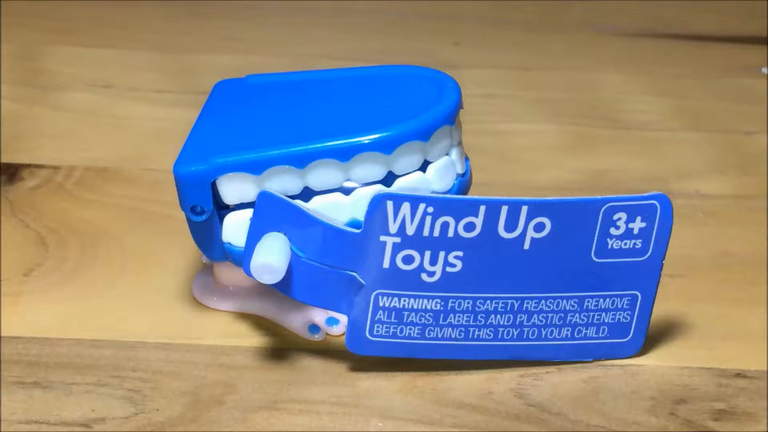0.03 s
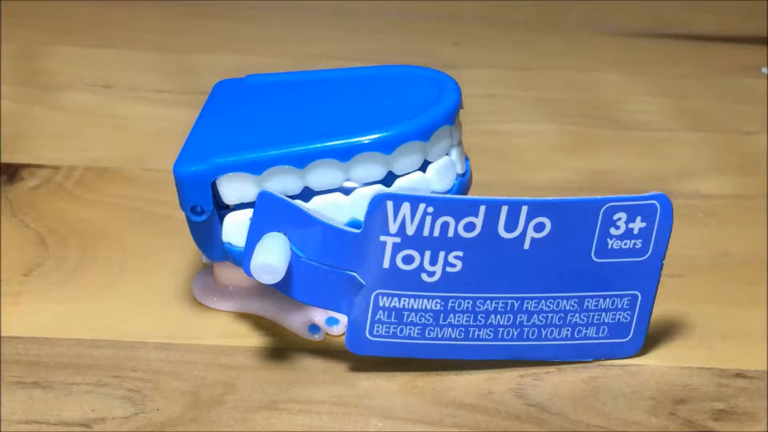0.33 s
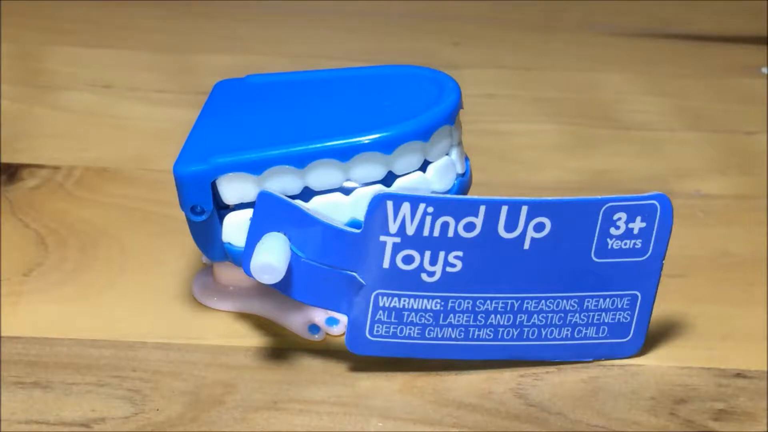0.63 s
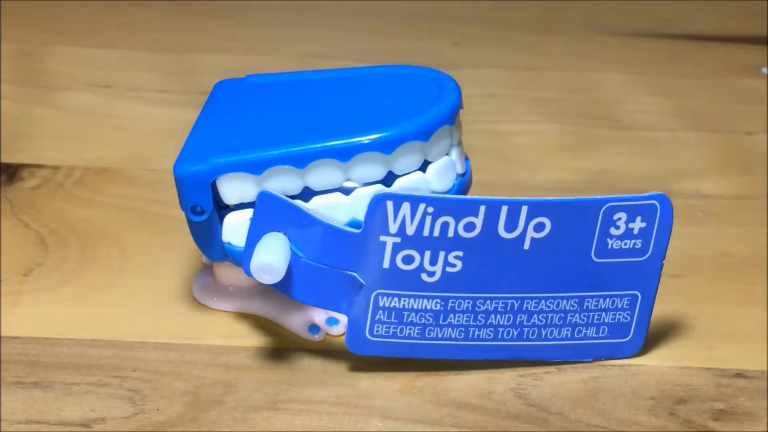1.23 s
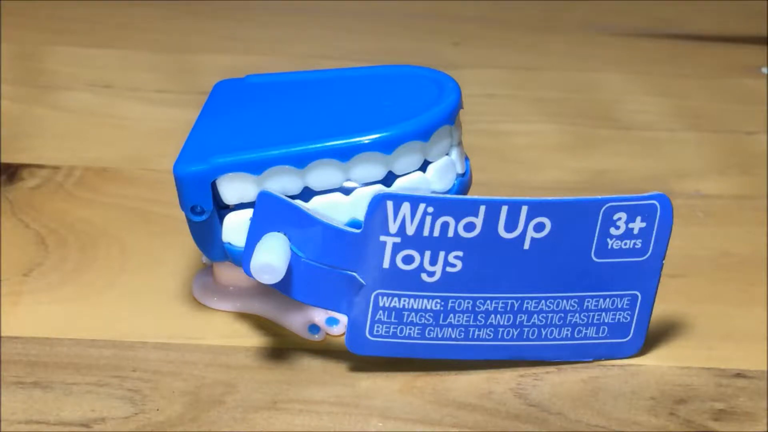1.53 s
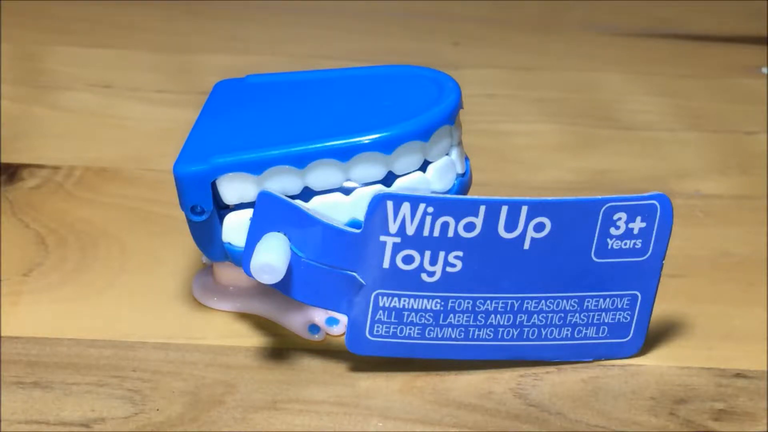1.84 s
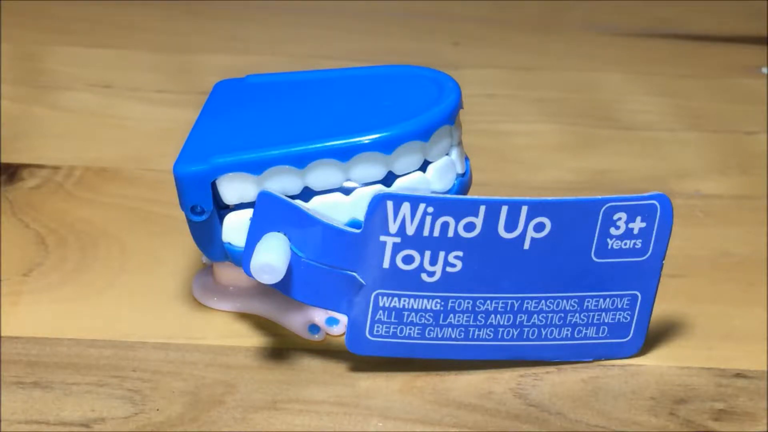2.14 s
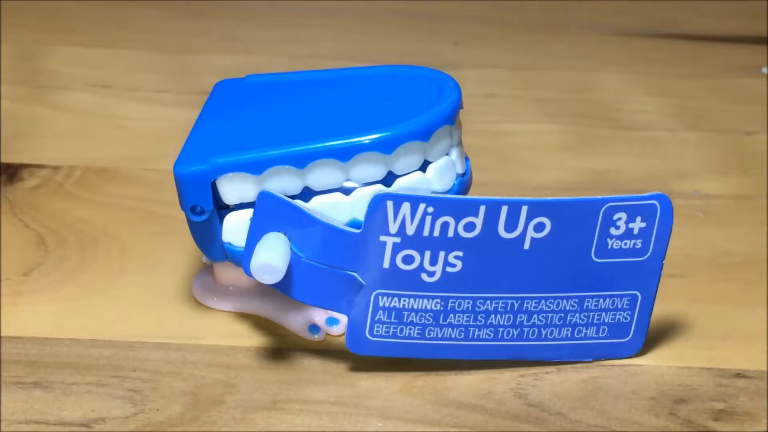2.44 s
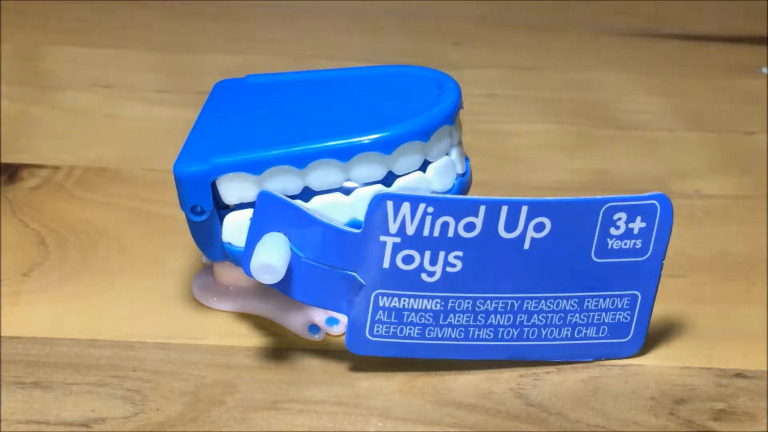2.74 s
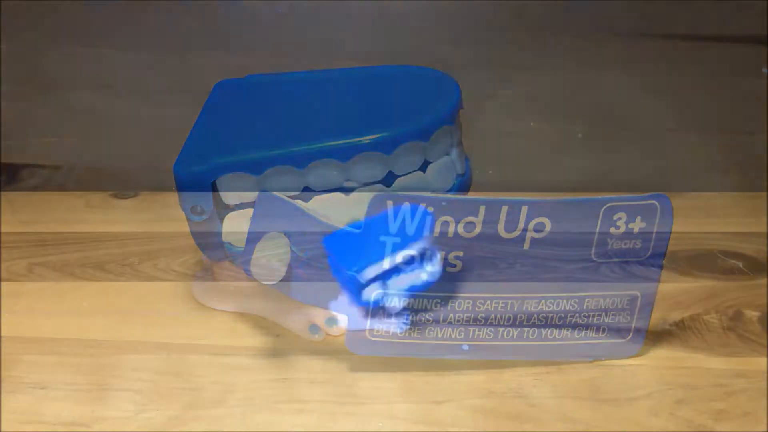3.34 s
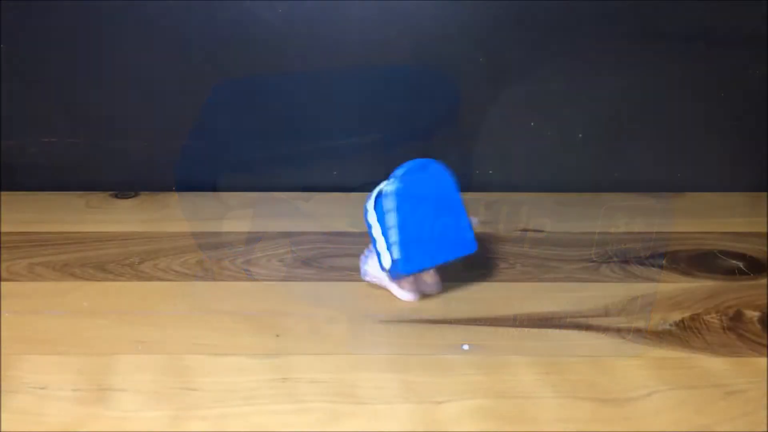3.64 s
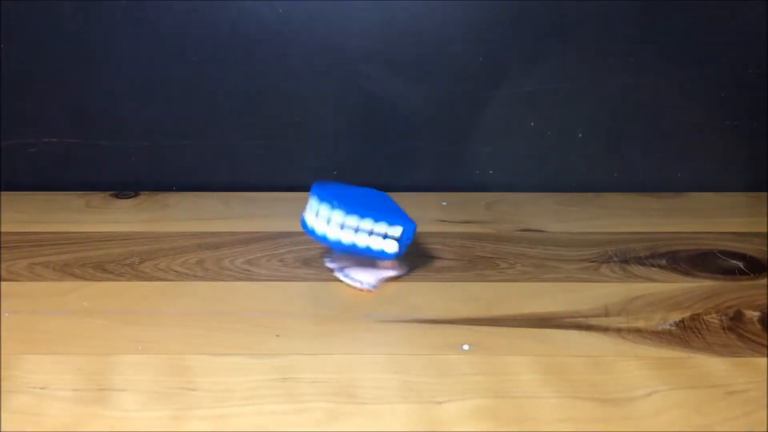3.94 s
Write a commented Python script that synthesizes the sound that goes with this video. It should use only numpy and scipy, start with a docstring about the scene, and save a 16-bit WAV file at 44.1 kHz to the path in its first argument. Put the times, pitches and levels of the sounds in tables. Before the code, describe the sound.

Wind-up plastic teeth chatter and hop on a wooden table, close by in a small room. For the first 2.8 seconds there is only a faint, low room hum. Then the toy starts suddenly, with sharp, hollow clacks in a fast, uneven run until about 4 seconds. Gears tick between the clacks, and the landings add light knocks and thuds on the wood, with a short room echo.

```python
"""Quiet room hum comes first; then a wind-up pair of plastic teeth chatters and hops on a wooden table,
close by in a small room. Once the spring is let go, each clack is a brief buzz of loose parts that rings
the hollow jaws and knocks the table. Gears tick in between, heavy landings thud, and the recorder
rounds the peaks."""
import sys
import numpy as np
from scipy import signal
from scipy.fft import rfft, irfft
from scipy.io import wavfile

SR = 44100
rng = np.random.default_rng(int(sys.argv[2]) if len(sys.argv) > 2 else 0)


def inscribe(sig):
    """Save sig as 16-bit PCM at rate SR to the path in sys.argv[1].

    A 1-D sig is mono; a 2-D sig holds one channel per row.
    Samples are clipped to [-1, 1] before scaling.
    """
    pcm = np.round(np.clip(np.atleast_2d(sig).T, -1, 1) * 32767)
    wavfile.write(sys.argv[1], SR, pcm.astype(np.int16))


N = 176400


def undb(db):
    """Decibels to gain."""
    return 10 ** (np.asarray(db) / 20)


def add(out, t, sound):
    """Mix a sound in at t seconds."""
    i = min(int(t * SR), N)
    out[i:i + len(sound)] += sound[:N - i]


def noise(colour):
    """Noise of rms 1, coloured by (frequency [Hz], relative level [dB]) points."""
    hz, db = np.array(colour, float).T
    bin_hz = np.maximum(np.arange(N // 2 + 1) * SR / N, 1)
    eq = undb(np.interp(np.log(bin_hz), np.log(hz), db))
    coloured = irfft(rfft(rng.standard_normal(N)) * eq, N)
    return coloured / coloured.std()


def bursts(times, dbs, decays, attack_s=0.00045, hold_s=0.0012):
    """Envelope of hits that rise, hold briefly and die away; their powers add."""
    power, age = np.zeros(N), np.arange(SR // 4) / SR
    for t, db, decay in zip(times, dbs, np.broadcast_to(decays, len(times))):
        shape = np.minimum(age / attack_s, 1) * np.exp(-np.maximum(age - hold_s, 0) / decay)
        add(power, t, (undb(db) * shape) ** 2)
    return np.sqrt(power)


def ring(modes, times, dbs, tunings=1, rise_s=0.0012, detune=0.01, spread_db=2.5):
    """Every hit sets the modes ringing, each time with a slightly different pitch and balance."""
    out, age = np.zeros(N), np.arange(SR // 5) / SR
    hz, t60, db = np.array(modes, float).T[:, :, None]
    envelope = undb(db - 60 * age / t60) * (1 - np.exp(-(age / rise_s) ** 2))
    for t, hit_db, tuning in zip(times, dbs, np.broadcast_to(tunings, len(times))):
        drift, balance = rng.standard_normal((2, len(modes), 1))
        tones = np.sin(2 * np.pi * hz * tuning * (1 + detune * drift) * age)
        add(out, t, (undb(hit_db + spread_db * balance) * envelope * tones).sum(0))
    return out


# bed of room air (frequency [Hz], relative level [dB])
AIR_COLOUR = [(25, -25), (39, -19), (70, -13.5), (97, 1), (123, -6.5), (153, -8.5), (317, -14.5),
              (344, -8.5), (463, -26.5), (545, -23), (840, -31), (2410, -38), (16000, -51.5)]
# appliance hum partials (frequency [Hz], level [dB])
HUM_PARTIALS = [(49, -65), (99, -61.5), (149, -62.5), (346.5, -65)]
# one faint rustle (time [s], level [dB], decay [s])
RUSTLE_CUE = (1.059, -68.5, 0.028)
# its papery colour (frequency [Hz], relative level [dB])
RUSTLE_EQ = [(1700, -20), (2300, -1), (3300, -24), (4300, -10), (5600, -40)]

def room_tone(start_s=0.15, waver_depth=0.3):
    """The background bed: low air noise, a wavering appliance hum and one faint rustle."""
    t = np.arange(N) / SR
    slow = [(1, 0), (4, 0), (15, -30), (100, -100)]
    hum = np.zeros(N)
    for hz, db in HUM_PARTIALS:
        waver = 1 + waver_depth * (noise(slow) + 1j * noise(slow))  # in level and phase
        hum += undb(db) * np.sqrt(2) * np.real(waver * np.exp(2j * np.pi * hz * t))
    onset, db, decay = RUSTLE_CUE
    rustle = noise(RUSTLE_EQ) * bursts([onset], [db], decay, attack_s=0.0049, hold_s=0.023)
    return (undb(-55.5) * noise(AIR_COLOUR) + hum + rustle) * (t > start_s)


def room_reverb(sound, predelay_s=0.0053):
    """The walls return a short diffuse tail; the mids linger longer than the treble."""
    age = np.arange(SR // 2) / SR
    build_up = np.clip(age / predelay_s - 1, 0, 1)
    mids = [(150, -3), (500, 1.5), (1300, -0.5), (2500, -13.5), (5000, -37)]
    treble = [(1000, -12), (2300, 2), (7000, 0), (10000, -0.5), (16000, -9.5)]
    wet = np.zeros(N)
    for colour, t60, send_db in ((mids, 0.93, -4), (treble, 0.35, -12.5)):
        tail = noise(colour)[:len(age)] * undb(-60 * age / t60) * build_up
        power = np.abs(rfft(tail)) ** 2
        passband_gain = np.sqrt((power ** 2).sum() / power.sum() / 2)
        wet += undb(send_db) * signal.fftconvolve(sound, tail / passband_gain)[:N]
    return wet


# resonances of the plastic body (frequency [Hz], width [Hz], level [dB])
SHELL_RESONANCES = [(2600, 137, 2), (4687, 136, -2.5), (6080, 92, 0), (6453, 58, 3.5), (6960, 106, -0.5),
                    (9540, 175, -1)]

def shell(sound, wander_db=3.5):
    """The hollow plastic body lifts its own resonances, more or less as the jaws open and the toy turns."""
    out = sound
    for hz, width, db in SHELL_RESONANCES:
        wander = noise([(1, 0), (20, 0), (60, -40), (200, -120)])
        resonance = signal.lfilter(*signal.iirpeak(hz, hz / width, fs=SR), sound)
        out = out + undb(db + wander_db * wander) * resonance
    return out


def gears(clack_t, clack_db, release_s=2.777, ticks_per_s=75):
    """Small uneven ticks of the running clockwork, and a rebound of its slack parts after every clack."""
    jitter, accent = rng.standard_normal((300, 2)).T
    tick_t = release_s + np.abs(np.arange(len(jitter)) + 0.223 * jitter) / ticks_per_s
    tick_db = -33 + 7.5 * np.tanh(accent)
    lag, softness = rng.standard_normal((len(clack_t), 2)).T
    rebound_t = clack_t + 0.0061 + 0.012 * np.abs(lag)
    rebound_db = clack_db - 12.5 - 4.5 * softness
    envelope = bursts(np.r_[tick_t, rebound_t], np.r_[tick_db, rebound_db], 0.0011, hold_s=0.00075)
    return shell((noise(CRACK_COLOUR) + 0.5 * noise(TREBLE_COLOUR)) * envelope)


# clockwork clicks between the clacks (time [s], level [dB], ping pitch [Hz])
CLICK_CUES = [(2.835, -27, 8400), (2.8428, -17.5, 5400), (2.955, -22, 5120), (3.0156, -23.5, 2440),
              (3.0517, -22, 5740), (3.167, -19, 5630), (3.273, -22.5, 3980), (3.2966, -21, 6800),
              (3.3977, -21, 5150), (3.483, -24.5, 8500), (3.5894, -23.5, 5880), (3.693, -21, 5350),
              (3.854, -18, 5860), (3.941, -22.5, 6400)]

def clicks(decay_s=0.0037, ping_t60_s=0.024, ping_db=2.5):
    """Light clicks of the clockwork, each with a short squeaky ping."""
    times, dbs, _ = np.array(CLICK_CUES).T
    snaps = (noise(CRACK_COLOUR) + undb(-3) * noise(TREBLE_COLOUR)) * bursts(times, dbs, decay_s)
    pings = sum(ring([(hz, ping_t60_s, ping_db)], [t], [db]) for t, db, hz in CLICK_CUES)
    return snaps + pings


# heavy landings (time [s], thud level [dB], knock level [dB])
LANDING_CUES = [(2.897, -38, -50), (2.915, -35, -33), (2.979, -34.5, -69), (3.141, -27, -34.5),
                (3.321, -40, -36), (3.372, -32.5, -38), (3.424, -37.5, -42), (3.637, -33, -36),
                (3.881, -33, -65)]
# knock under the clacks as the toy travels (time [s], level against the clack [dB])
KNOCK_RIDE = [(2.8, -27), (3.0, -31.5), (3.2, -22), (3.4, -19.5), (3.52, -30.5), (3.65, -23.5),
              (3.79, -17.5), (3.88, -31.5)]
# woody colour of a knock (frequency [Hz], relative level [dB])
KNOCK_COLOUR = [(100, -4), (420, -21.5), (560, -6), (750, -9), (1100, -2), (1500, -2.5), (2500, -29)]
# ring of the table top (frequency [Hz], t60 [s], relative level [dB])
WOOD_MODES = [(566.7, 0.07, -3), (999, 0.031, 6.5), (1209, 0.072, 2)]
# heavily damped bending under a landing (frequency [Hz], t60 [s], relative level [dB])
BENDING_MODES = [(142, 0.03, 1), (227, 0.022, 3.5), (379, 0.018, -2)]

def table_top(clack_t, clack_db, decay_s=0.0098, ring_db=-7):
    """The wood knocks and rings under every clack; landings add a short thud."""
    landing_t, thud_db, knock_db = np.array(LANDING_CUES).T
    ride_db = np.interp(clack_t, *np.array(KNOCK_RIDE).T)
    times, dbs = np.r_[clack_t, landing_t], np.r_[clack_db + ride_db, knock_db]
    knocks = noise(KNOCK_COLOUR) * bursts(times, dbs, decay_s)
    return knocks + ring(WOOD_MODES, times, dbs + ring_db) + ring(BENDING_MODES, landing_t, thud_db)


def loose_parts(clack_t, clack_db, low_hz=3305, high_hz=13390, t60_s=0.045, ping_db=-11):
    """Each clack sets a few different teeth and gear wheels pinging briefly."""
    pitches = low_hz * (high_hz / low_hz) ** rng.random(size=(len(clack_t), 4))
    pings = np.zeros(N)
    for t, db, cluster in zip(clack_t, clack_db, pitches):
        pings += ring([(hz, t60_s, ping_db) for hz in cluster], [t], [db])
    return pings


# bite, sizzle and hollow body of the plastic (frequency [Hz], relative level [dB])
CRACK_COLOUR = [(1000, -54), (2000, -4), (2600, 0.5), (3400, 0.5), (4300, 2), (5300, 0), (7200, 2.5),
                (8300, -3), (10000, -15), (16000, -28)]
TREBLE_COLOUR = [(3000, -32), (6500, -56), (8400, 0), (9600, 2.5), (10500, -2.5), (12300, 0), (14500, -4),
                 (16000, -6.5)]
HOLLOW_COLOUR = [(300, -14), (900, -47), (1400, -7), (1700, 5), (2100, 8.5), (2600, -4), (4000, -12.5)]
# ring of the jaws, and of the teeth snapping shut (frequency [Hz], t60 [s], relative level [dB])
JAW_RING = [(2331.5, 0.056, 2.5), (2554, 0.034, 1)]
SNAP_RING = [(4632, 0.021, 8.5)]
# jaw pitch as the toy shifts its stance (time [s], pitch [ratio])
JAW_BEND = [(2.8, 0.97), (3.5, 1), (3.63, 1.04)]
# clacks of jaws and feet; the last four columns trim layers against the clack's level
# (time [s], level [dB], decay [s], treble [dB], hollow [dB], jaw ring [dB], snap [dB])
CLACK_CUES = [(2.778, -16.5, 0.003, -11, -21, -5, -16), (2.7843, -11.5, .0045, -4, -12.5, -5.5, -19),
              (2.8028, -11.5, 0.0045, -5.5, -16.5, -20, 0.5), (2.8626, -12, 0.0024, -4, -11.5, -10, -9),
              (2.8714, -20, .0035, -4, -21, -27, -11), (2.8967, -13, 0.0033, -4.5, -13, -26, 0.5),
              (2.919, -13.5, 0.0033, -6, -20, -14, -24), (2.9787, -13.5, 0.0045, -1.5, -14, -7, -27),
              (3.076, -11.5, 0.0031, -3, -6.5, -29, -30), (3.096, -13, 0.005, -4.5, -8.5, -11, -5),
              (3.1188, -13.5, 0.0039, -3.5, -13.5, -5, -7), (3.1399, -9.5, 0.0039, -7.5, -14, -10, -8.5),
              (3.1817, -12.5, 0.0044, -4.5, -13.5, -1, -19), (3.1956, -17.5, .0015, -3, -5, -12, -8),
              (3.2179, -10, 0.0051, -5.5, -15.5, -2, -6), (3.243, -12.5, 0.002, -3, -13.5, -28, -8),
              (3.3061, -14.5, .0055, -4.5, -16, -3.5, -27), (3.3205, -13.5, 0.0033, -1.5, -11.5, -8, -6),
              (3.3457, -10.5, 0.0024, -3.5, -26, -7, -18), (3.3694, -11, 0.0021, -8, -26, -13.5, -3),
              (3.4233, -14, 0.0059, -4, -34, -0.5, 1), (3.4432, -14, 0.0035, -2.5, -17, -6, -7),
              (3.5018, -14, 0.0048, -3, -13.5, 5, -5), (3.5103, -25, 0.0017, 2, -18, -2, -21),
              (3.6166, -20.5, 0.0025, -10, -13, -7, -21), (3.6261, -12.5, 0.0034, -3, -15, -1.5, -24),
              (3.644, -16, 0.0048, -3, -12.5, -3, -20), (3.7163, -20, 0.0027, -2.5, -15, -14, -12),
              (3.7375, -13.5, 0.0022, -3, -21, -2.5, -10), (3.7491, -15.5, 0.0062, -4.5, -9, 0, -6),
              (3.771, -16.5, 0.0064, -6, -17, -19, -21), (3.793, -15, 0.0042, -7, -17, -8, -16),
              (3.8802, -11, 0.003, -2.5, -13, -8, -6), (3.903, -12.5, 0.0027, -4.5, -10, -30, -1),
              (3.9659, -16, 0.0013, -5, -15, -18, 2), (3.976, -14.5, 0.0027, -1, -12.5, -10, -8)]

def teeth(lead_s=0.0039):
    """Each clack leads in with a light scrape, buzzes the loose parts and leaves jaws and teeth ringing."""
    t, db, decay, treble_db, hollow_db, jaw_db, snap_db = np.array(CLACK_CUES).T
    scrape_db = db - 18 + 4 * rng.standard_normal(len(t))
    scrape = bursts(t - lead_s, scrape_db, lead_s, attack_s=lead_s)
    crack = noise(CRACK_COLOUR) * np.hypot(scrape, bursts(t, db - 0.5, decay))
    treble = noise(TREBLE_COLOUR) * np.hypot(scrape, bursts(t, db + treble_db + 4.5, decay))
    hollow = noise(HOLLOW_COLOUR) * bursts(t, db + hollow_db + 5.5, decay)
    jaws = ring(JAW_RING, t, db + jaw_db, tunings=np.interp(t, *np.array(JAW_BEND).T))
    return shell(crack + treble + hollow) + jaws + ring(SNAP_RING, t, db + snap_db)


def scene():
    """Mono mix: the toy on its table up front, its reverb and the quiet room behind."""
    clacks = np.array(CLACK_CUES).T[:2]  # times and levels
    toy = teeth() + loose_parts(*clacks) + clicks() + gears(*clacks) + table_top(*clacks)
    return (toy + room_reverb(toy) + room_tone())[None]


def record(dry, low_cut_hz=42, high_cut_hz=15850):
    """The recorder drops the deep bass, rounds the loudest peaks and cuts the top."""
    low_cut = signal.butter(6, low_cut_hz, "high", fs=SR, output="sos")
    high_cut = signal.ellip(10, 0.2, 70, high_cut_hz, fs=SR, output="sos")
    rounded = np.tanh(signal.sosfilt(low_cut, dry))
    return signal.sosfilt(high_cut, rounded)


dry = scene()
out = record(dry)
inscribe(out)
```